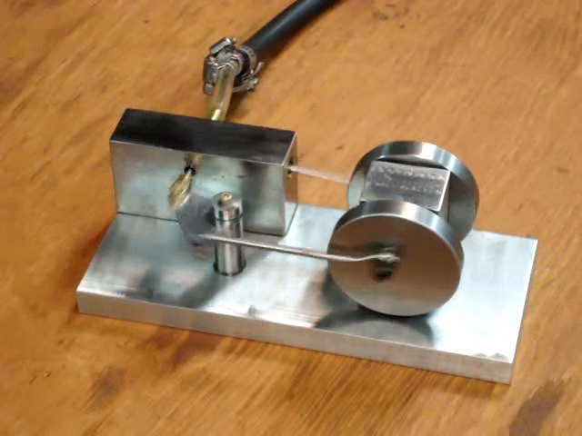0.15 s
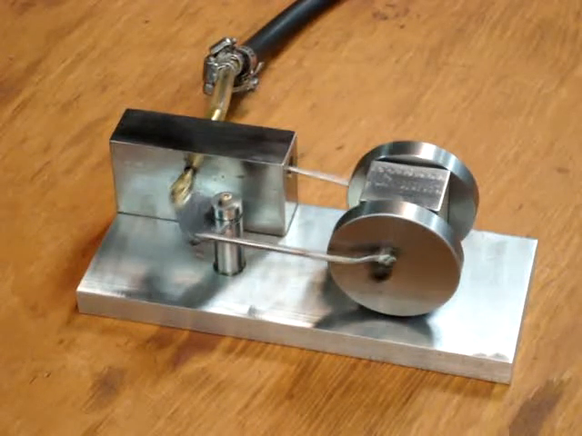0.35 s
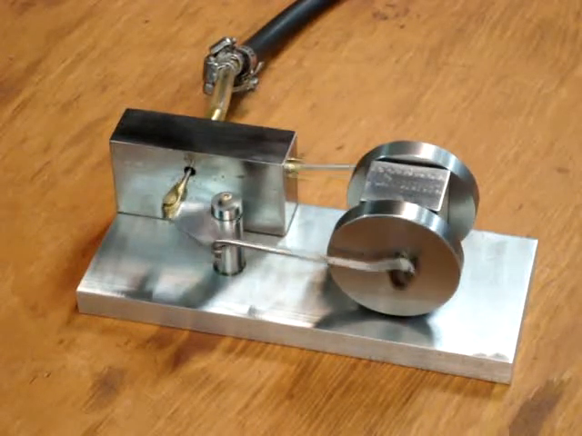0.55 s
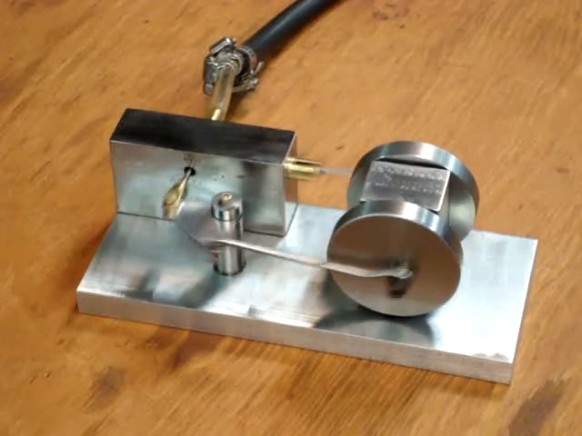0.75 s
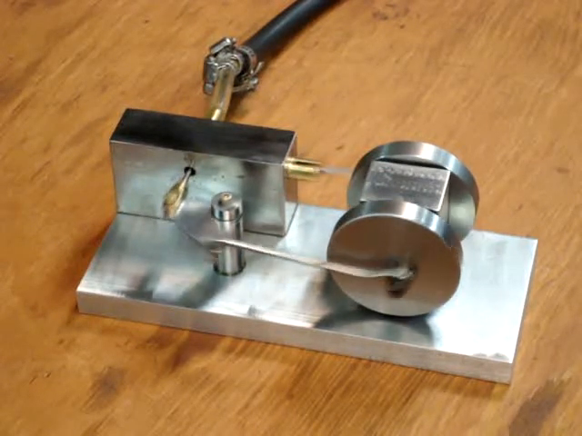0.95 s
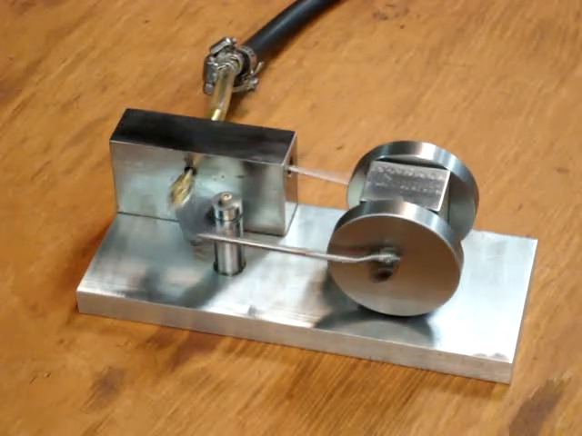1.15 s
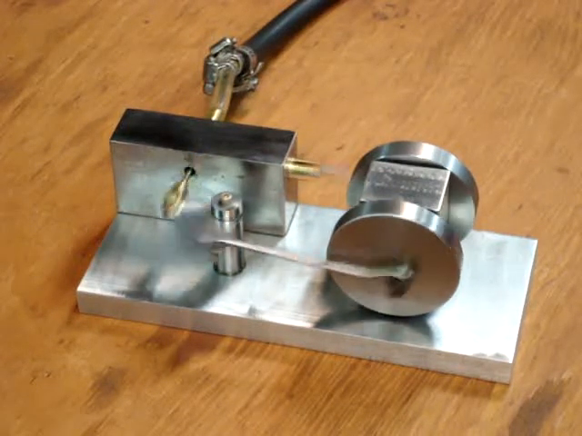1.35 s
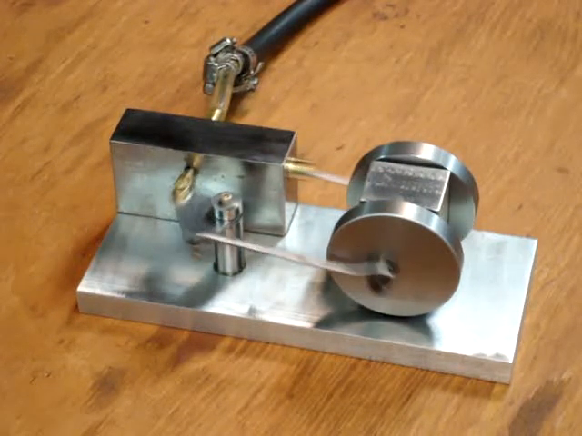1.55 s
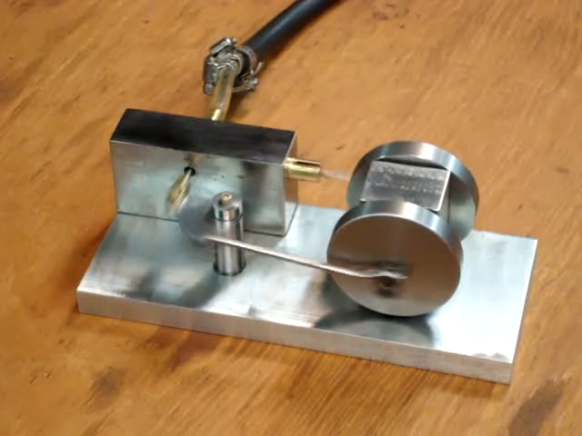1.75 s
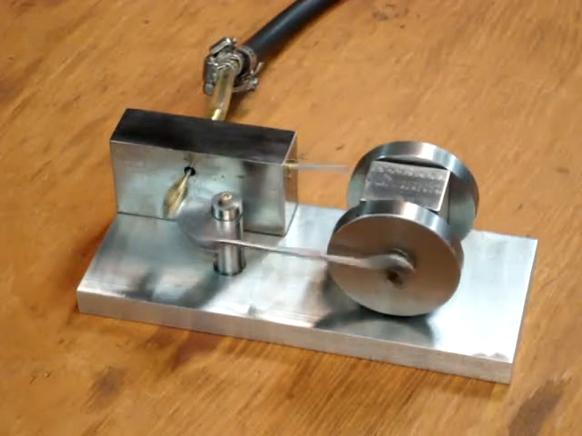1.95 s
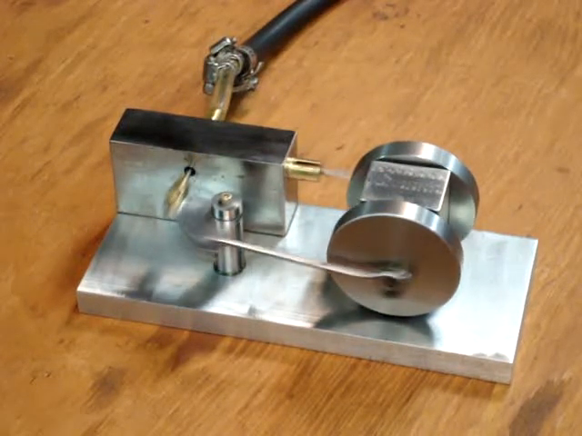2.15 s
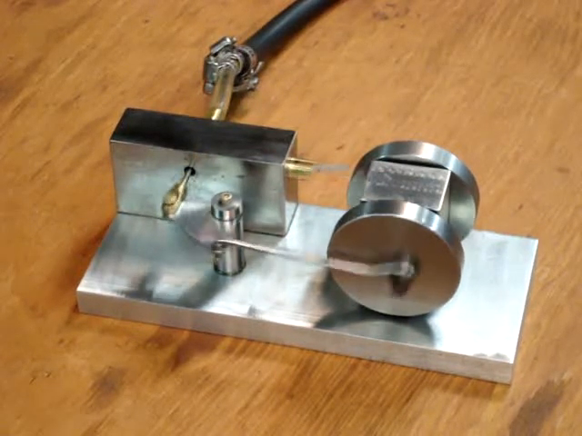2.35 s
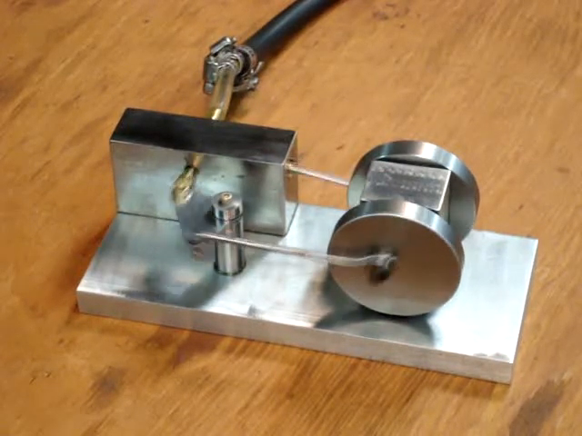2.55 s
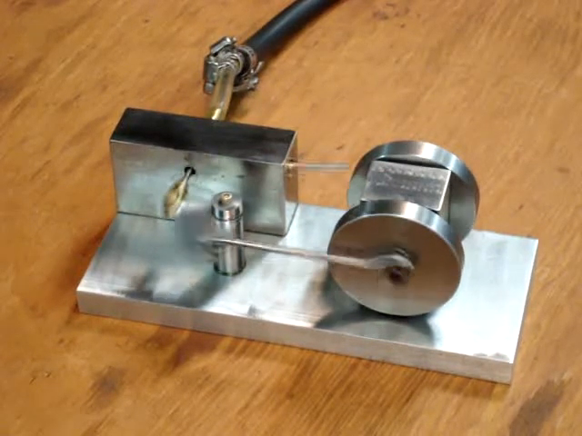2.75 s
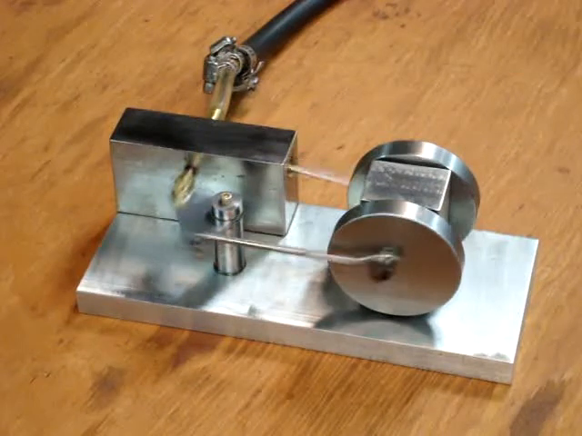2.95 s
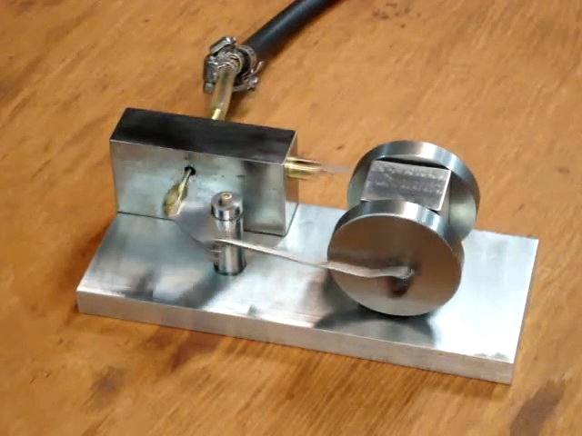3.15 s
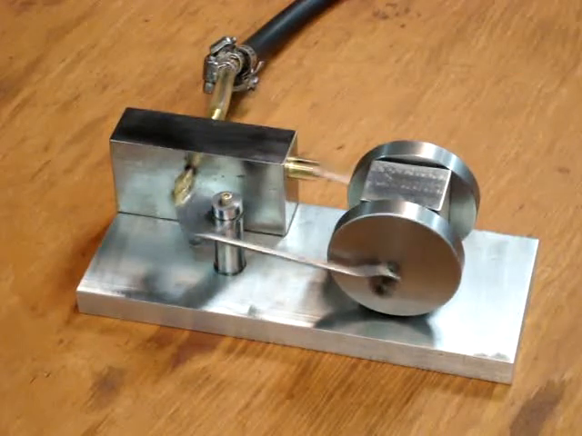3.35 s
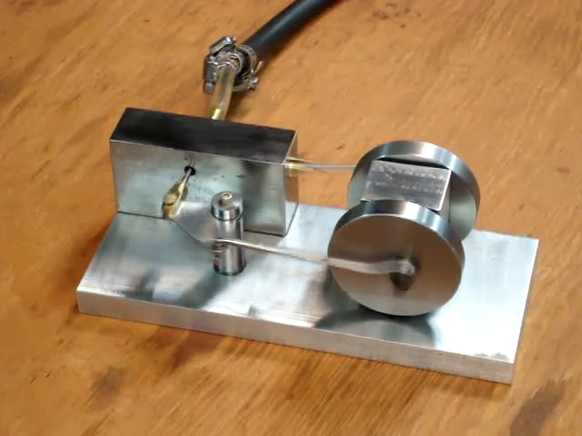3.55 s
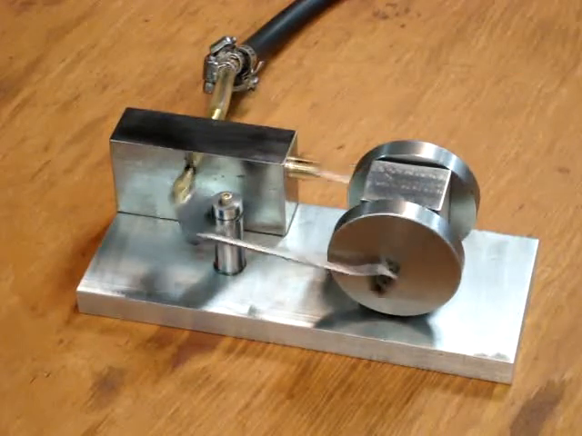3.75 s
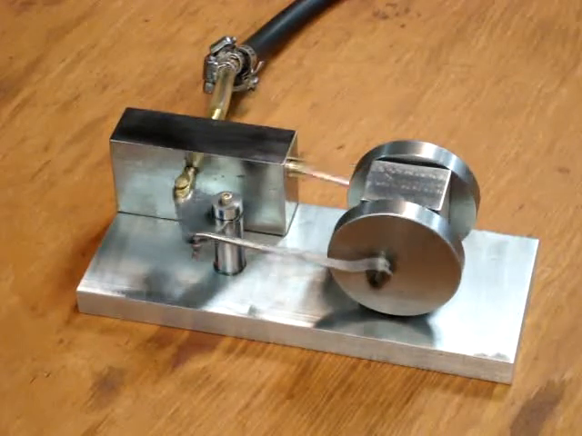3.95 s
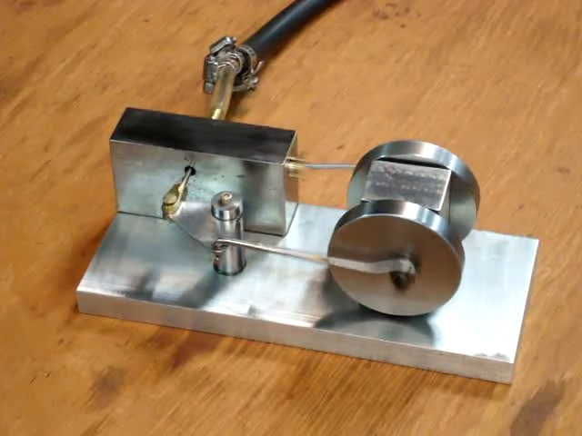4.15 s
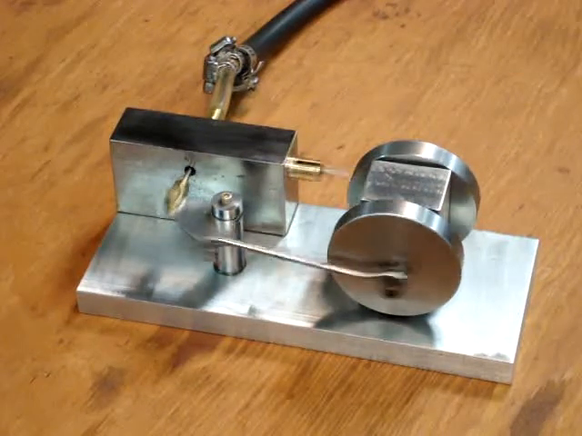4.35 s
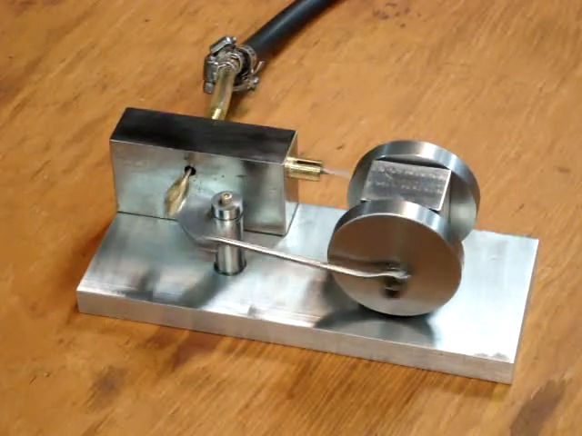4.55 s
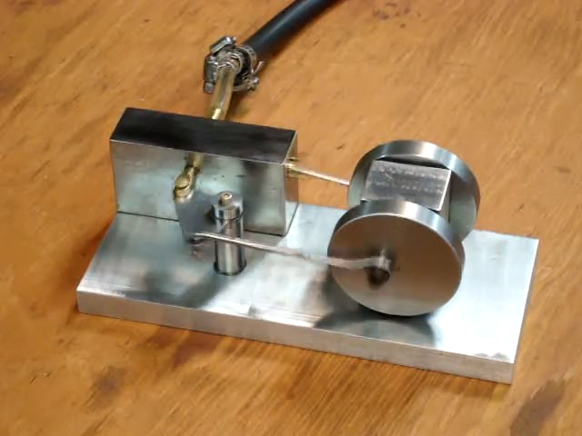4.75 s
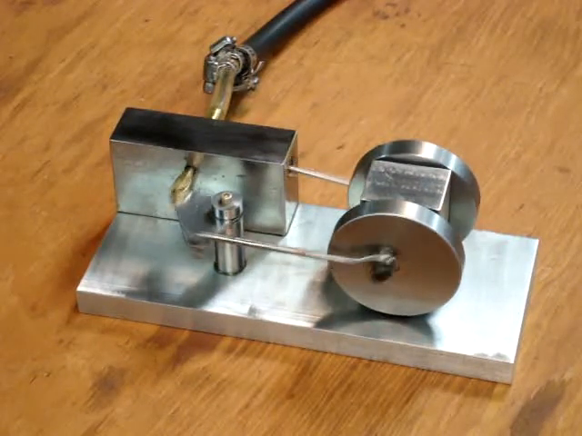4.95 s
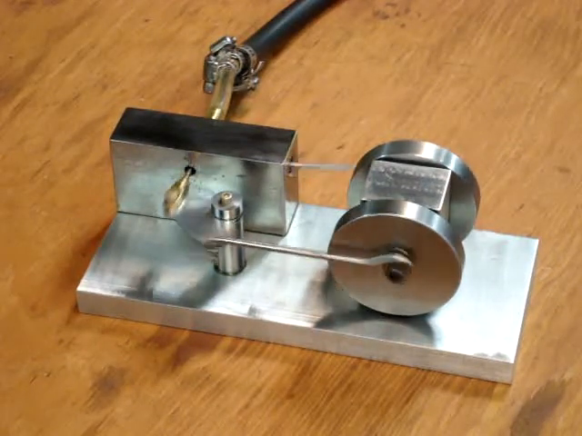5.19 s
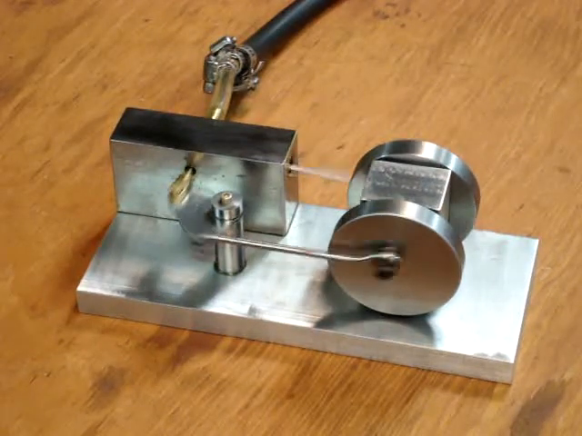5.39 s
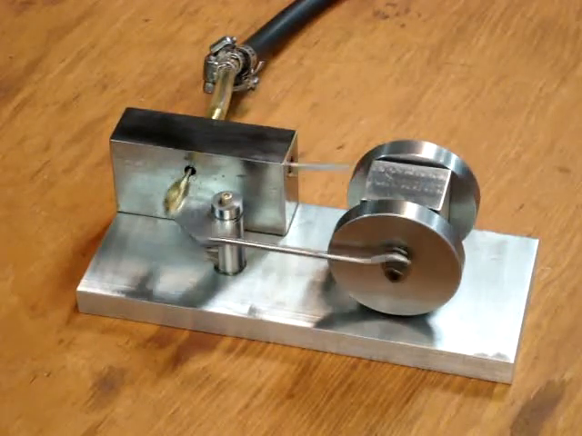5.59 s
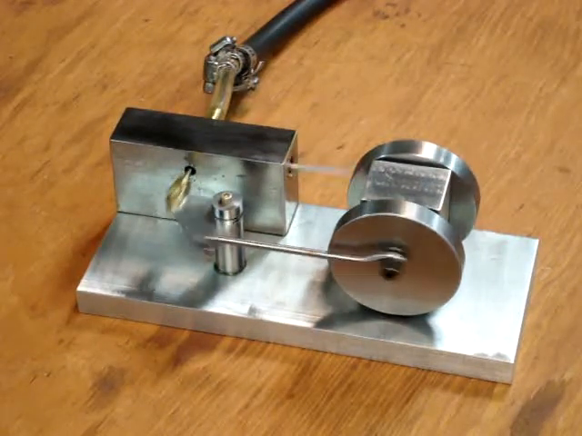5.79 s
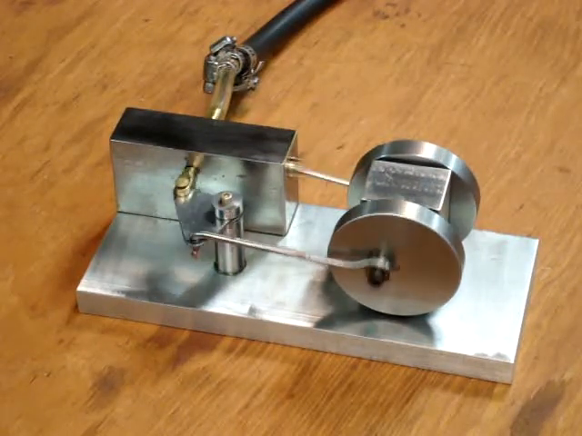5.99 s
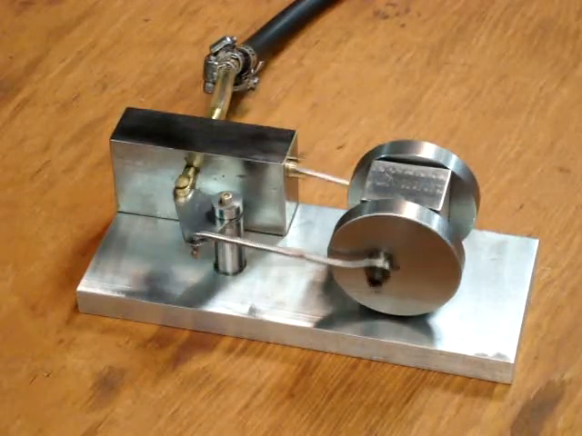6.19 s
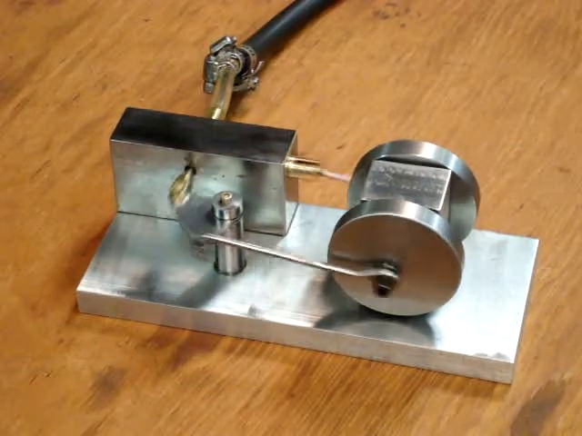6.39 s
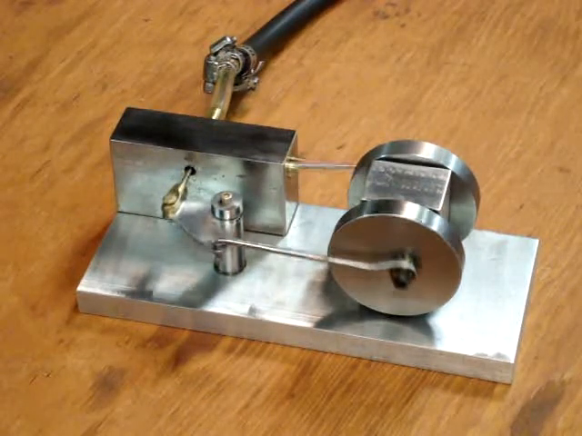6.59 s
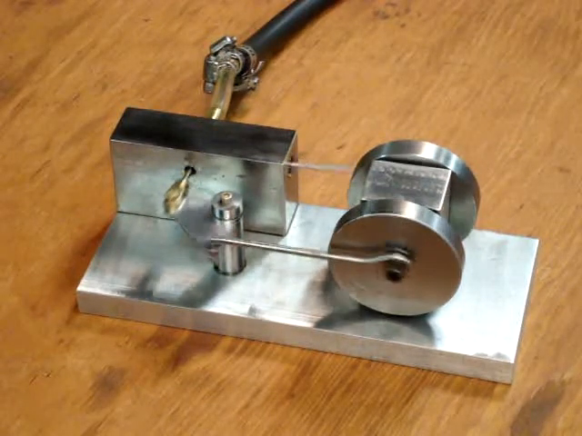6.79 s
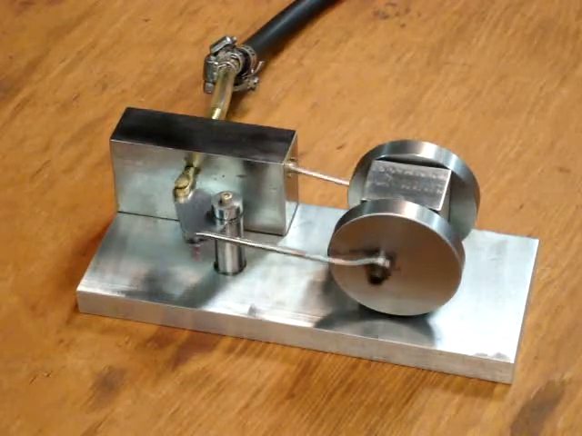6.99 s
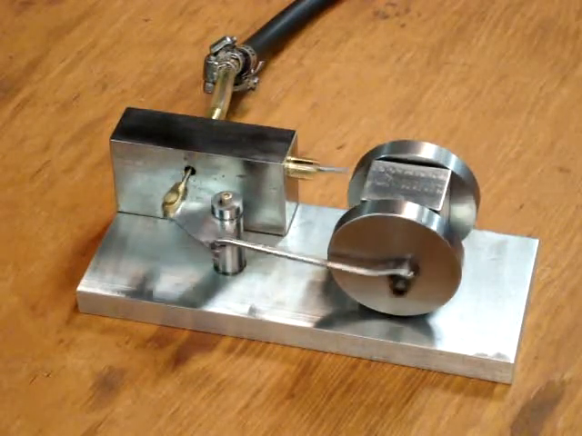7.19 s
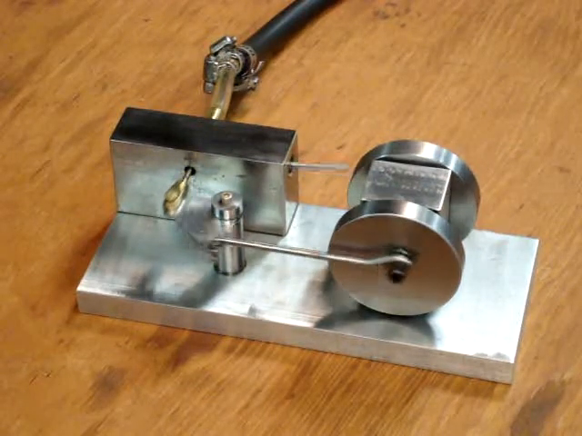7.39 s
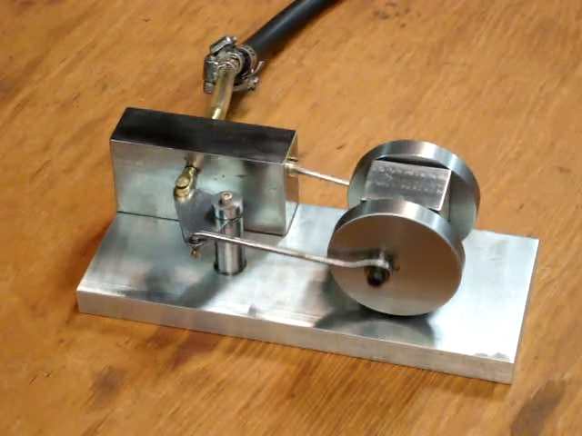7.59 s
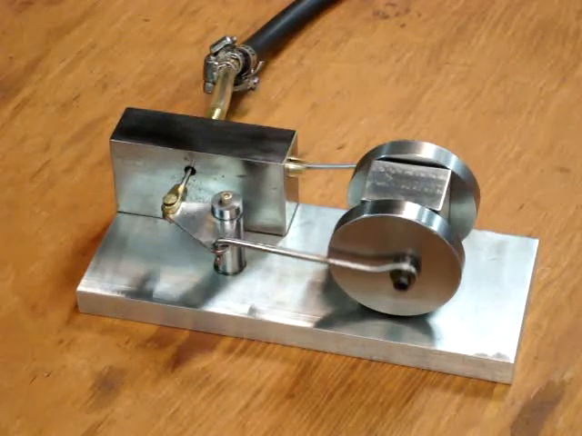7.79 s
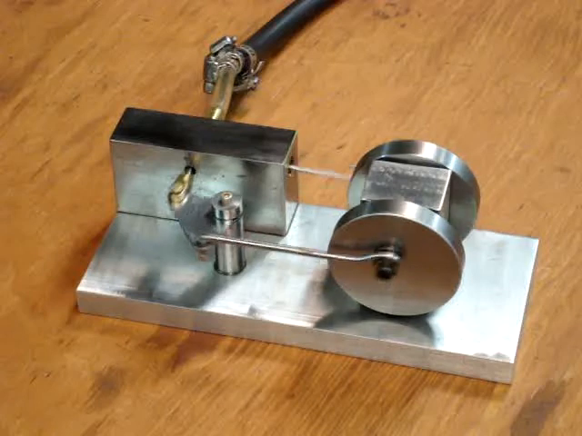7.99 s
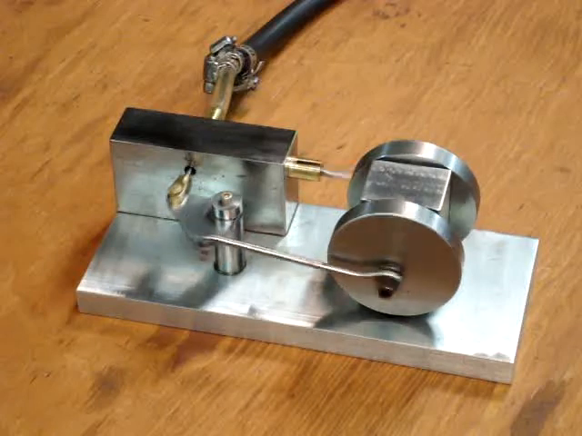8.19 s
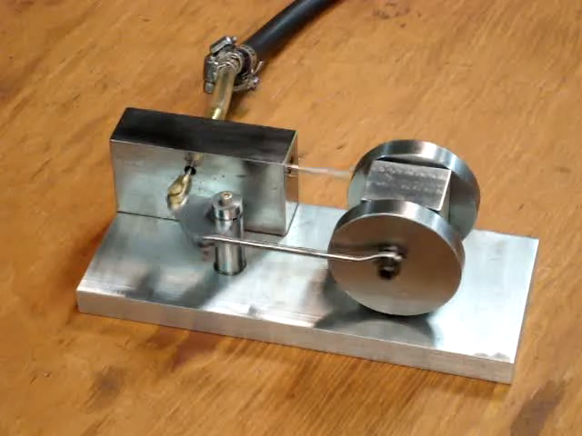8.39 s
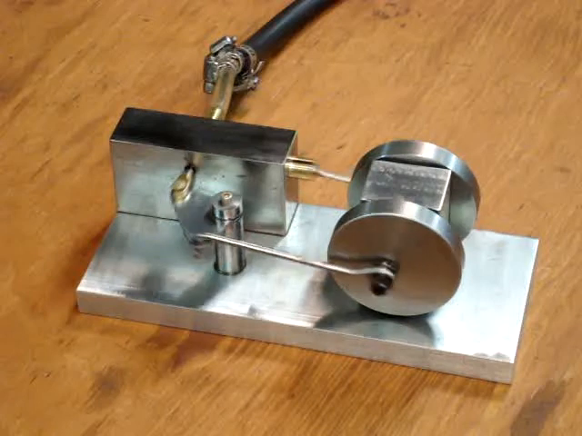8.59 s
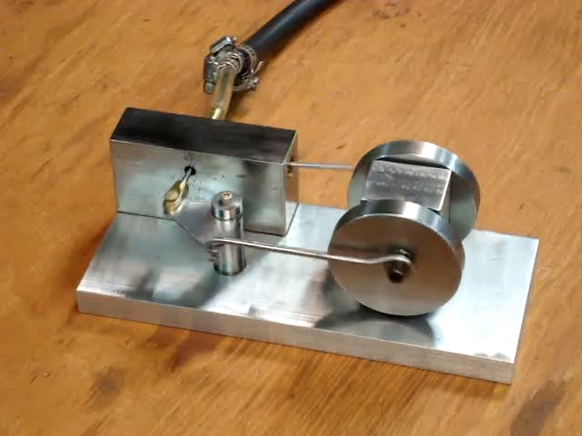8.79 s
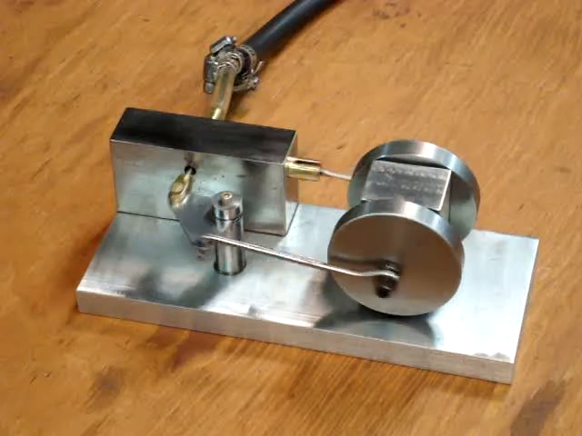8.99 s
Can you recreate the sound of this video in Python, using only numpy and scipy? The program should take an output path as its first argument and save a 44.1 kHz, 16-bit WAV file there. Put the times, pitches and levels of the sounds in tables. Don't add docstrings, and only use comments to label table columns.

```python
import sys
import numpy as np
from scipy import signal
from scipy.fft import rfft, irfft
from scipy.io import wavfile
from scipy.ndimage import uniform_filter1d, minimum_filter1d

SR = 44100
rng = np.random.default_rng(int(sys.argv[2]) if len(sys.argv) > 2 else 0)


def magnitude_from_level(level_db):
    exponent = np.asarray(level_db, float) / 20
    return 10 ** exponent


def output_pcm(signal):
    pcm = np.clip(np.atleast_2d(signal).T, -1, 1) * 32767
    wavfile.write(sys.argv[1], SR, np.round(pcm).astype(np.int16))


N = 398223
TIME = np.arange(N) / SR
LAZY_TURN_S = 0.17


def unit(x):
    return x / np.sqrt(np.mean(x ** 2))


def topped(x, db):
    return x * magnitude_from_level(db) / np.abs(x).max()


def walk(rate_hz):
    k = int(SR / rate_hz)
    return unit(uniform_filter1d(uniform_filter1d(rng.standard_normal(N), k), k))


def coloured(points):
    hz, db = np.transpose(points)
    axis = np.log(np.fft.rfftfreq(N, 1 / SR) + 1)
    shape = magnitude_from_level(np.interp(axis, np.log(hz), db, left=-60))
    return unit(irfft(rfft(rng.standard_normal(N)) * shape, N))


def ring(x, modes, sense=-1):
    out = 0
    for k, (hz, db, t60) in enumerate(modes):
        pole = np.exp(2j * np.pi * hz / SR - np.log(1000) / (t60 * SR))
        mode = signal.lfilter([0, pole.imag], [1, -2 * pole.real, abs(pole) ** 2], x + 1e-18)
        out = out + sense ** k * magnitude_from_level(db) * mode
    return out


def blows(times, db, push_ms):
    x = np.zeros(N)
    place = np.asarray(times) * SR
    np.add.at(x, place.astype(int), magnitude_from_level(db) * (1 - place % 1))
    np.add.at(x, place.astype(int) + 1, magnitude_from_level(db) * (place % 1))
    push = np.exp(-0.5 * (np.arange(-40, 41) / (push_ms * SR / 1000)) ** 2)
    return np.convolve(x, push / push.sum(), "same")


def rattle(hit, t60):
    fade = signal.lfilter([1], [1, -np.exp(-np.log(1000) / (t60 * SR))], hit)
    return fade * rng.standard_normal(N) * magnitude_from_level(3 * walk(500))


# t/s, rate/(turns per s)
FLYWHEEL = [(0.0, 5.7163), (0.58, 5.6899), (0.84, 5.9451), (1.05, 6.4457), (1.38, 7.5074), (1.64, 7.9698),
            (2.02, 8.0224), (3.03, 7.5013), (3.62, 6.9713), (4.75, 5.6031), (5.41, 4.9757), (6.91, 3.4855),
            (7.11, 3.4541), (8.07, 2.8346), (9.03, 2.5196)]


def speed(s):
    return np.interp(s, *np.transpose(FLYWHEEL))


def crank():
    start_turn = 0.8235
    return start_turn + np.cumsum(speed(TIME)) / SR


def passes(angle, slip_per_s=0.):
    turns = crank()
    whole = np.arange(1, int(turns[-1]) + 1)
    lazy = np.maximum(1 / speed(np.interp(whole + angle, turns, TIME)) - LAZY_TURN_S, 0)
    s = np.interp(whole + angle - slip_per_s * lazy, turns, TIME)
    return s[s < TIME[-1]]


# t/s, table rumble level/dB, scuff level after the knock/dB, scuff level at the far end/dB
RUN = [(0.0, -45.5, -39.5, -42), (0.6, -46.5, -39.5, -43), (0.9, -45.5, -37.5, -32),
       (1.08, -43.5, -30.5, -33.5), (1.3, -41, -34, -33), (1.72, -42, -40.5, -42), (2.0, -40.5, -37.5, -43),
       (2.6, -42.5, -36.5, -47.5), (3.6, -43.5, -41, -49), (4.7, -47.5, -42, -51.5), (5.4, -48.5, -45, -54),
       (6.2, -51.5, -40.5, -45.5), (6.8, -53, -44, -48.5), (7.25, -55, -40.5, -45.5), (7.7, -58, -39, -49),
       (8.25, -59, -39, -41.5), (8.65, -60, -41, -44.5), (9.03, -60, -41, -44.5)]


def run(s, axis):
    return np.interp(s, np.array(RUN)[:, 0], np.array(RUN)[:, axis])


# t/s, level/dB
KNOCK = [(0, -29.2), (.9, -27.8), (1.06, -26.2), (1.74, -26.3), (1.85, -23.4), (2.4, -22.2), (3.4, -23.8),
         (4.7, -25.2), (5.22, -28.2), (6.06, -28), (6.29, -33.7), (6.55, -32.3), (7.1, -46.5), (7.7, -45.2),
         (8.4, -45.6), (9.03, -49)]


def knock_strength(s):
    return np.interp(s, *np.transpose(KNOCK))


# f/Hz, level/dB
HUM = [(120, -87), (240, -73), (1320, -77), (1560, -74.5), (1680, -93.5)]
# f/Hz, level/dB per Hz
HUSH = [(30, -28.5), (110, -22), (230, -13), (500, -5), (1000, -13), (1900, -22), (4900, -24.5),
        (7600, -28), (9800, -24)]


def background():
    hum = sum(magnitude_from_level(db + 2.0 + 0.91 * walk(1)) * np.sin(2 * np.pi * hz * TIME) for hz, db in HUM)
    return magnitude_from_level(-54.5) * coloured(HUSH) + hum


# delay/ms, level/dB
ECHOES = [
    (8.0, -24),
    (19.5, -17),
]


def room(x):
    tail_db, tail_t60_s = -18.5, 0.55
    t = np.arange(int(0.3 * SR)) / SR
    tail = rng.standard_normal(len(t)) * magnitude_from_level(-60 * t / tail_t60_s) * np.minimum(t / 0.0013, 1)
    reply = magnitude_from_level(tail_db) * unit(tail) / np.sqrt(len(t))
    reply[0] = 1
    for ms, db in ECHOES:
        reply[int(ms * SR / 1000)] += magnitude_from_level(db)
    return signal.fftconvolve(x, reply)[:N]


# f/Hz, level/dB, t60/s
TABLE = [(323, -15.5, 0.12), (400.2, -8.5, 0.094), (452.4, -4.5, 0.24), (529.6, 3, 0.082), (590, 1, 0.038),
         (672.8, -1.5, 0.087), (784, -1.5, 0.019), (886.6, -3, 0.046), (945, -3.5, 0.12),
         (1010, -6.5, 0.14), (1040, -6.5, 0.074), (1082, -7.5, 0.13), (1132, -9, 0.086),
         (1203.6, -10, 0.18), (1263, -6.5, 0.053), (1446, -3.5, 0.017), (1555, -10, 0.077),
         (1704, -19, 0.1)]
# f/Hz, level/dB per Hz
SLIDE = [(1300, 0.5), (1900, -3.5), (2550, -2.5), (3400, -4), (4300, -6.5), (5700, -8.5), (7500, -13),
         (10000, -15.5)]


def bearings(turns, rumble_db, slide_db):
    spots = rng.standard_normal((2, 4096))
    rough = spots[0] * magnitude_from_level(1.84 * uniform_filter1d(spots[1], size=100) * 10)
    same = np.interp((turns % 1) * 4095, np.arange(4096), rough)
    swing_db = 2.6 * np.cos(2 * np.pi * (turns - 0.17)) + 1.1 * walk(30)
    force = (0.6 * unit(same) + unit(rng.standard_normal(N))) * magnitude_from_level(swing_db)
    force = force - uniform_filter1d(force, size=220)
    hiss = coloured(SLIDE) * magnitude_from_level(1.5 * np.cos(2 * np.pi * (turns - 0.1)) + 2 * walk(260))
    return magnitude_from_level(rumble_db - 1) * unit(ring(force, TABLE)) + magnitude_from_level(slide_db) * hiss


def scuffs():
    usual_ms, spread = 10.5, 0.19
    near, far = passes(0.033), passes(0.555, slip_per_s=0.2)
    s = np.r_[near, far]
    chance = rng.standard_normal((len(s), 4)).T
    ms = usual_ms * np.exp(spread * np.clip(chance[0], -2, 2) * np.minimum(speed(s) / 6, 1) ** 2)
    db = np.r_[run(near, axis=2), run(far, axis=3)] - 0.4 * (ms - usual_ms) + 0.9 * chance[1]
    ms[:len(near)] += 7 * np.maximum(1 / speed(near) - LAZY_TURN_S, 0)
    ms[len(near):] -= 10 * np.maximum(1 / speed(far) - LAZY_TURN_S, 0)
    climb = np.r_[3 + 0 * near, -4.5 + 0 * far] + 2.5 * chance[3]
    late = 0.0004 * (ms - usual_ms) + 0.0005 * chance[2]
    return zip(s + late, db, ms, climb)


# f/Hz, level/dB, t60/s
BORE = [(6483, -2.5, 0.0027), (7017, 5.5, 0.0045), (7607, 13, 0.0016), (7948, 5.5, 0.0037),
        (8790, -16, 0.0044), (9840, -11.5, 0.0038)]


def piston():
    swell = np.zeros((2, N))
    for s, db, ms, climb in scuffs():
        near = slice(max(int((s - 0.05) * SR), 0), int((s + 0.08) * SR))
        late = (TIME[near] - s - np.array([[-0.5], [0.5]]) * climb / 1000) / (ms / 1000)
        swell[:, near] += magnitude_from_level(db) * (np.exp(-np.abs(late / 0.7) ** 3) + 0.31 * (late > 0) * np.exp(-late / 5.6))
    grains = rng.standard_normal(N) * magnitude_from_level(3.5 * walk(700))
    low, high = ring(grains, BORE[:3]), -ring(grains, BORE[3:])
    body = np.std(low + high)
    low = low + body * rng.standard_normal(N) * magnitude_from_level(-20)
    steady = np.sqrt(uniform_filter1d(low ** 2 + high ** 2, size=260))
    return magnitude_from_level(-0.5 + 1.8 * walk(380)) * (swell[0] * low + swell[1] * high) / steady


# f/Hz, level/dB, t60/s
LEVER_LOOSE = [(3500, -8, .012), (3900, -3, .015), (4150, 0, .02), (4320, 0, .02), (4650, -4, .012),
               (5280, -5, .014)]


def lift(s, db):
    turn_s = 1 / speed(s)
    chance = rng.standard_normal((len(s), 2)).T
    times = s - (0.123 + 0.004 * chance[0]) * turn_s
    hit = blows(times, db - 26 + 2 * chance[1], push_ms=0.02)
    return ring(hit + magnitude_from_level(-9.0) * rattle(hit, t60=0.027), LEVER_LOOSE)


# turn number, level/dB
ODD_TAPS = [
    (9, -32.7),
    (10, -31.5),
    (11, -28.2),
    (12, -38.2),
    (39, -44.5),
    (41, -41.9),
    (44, -44),
    (45, -47),
]


def taps():
    stops_hz = 4.2
    s = passes(0.744, slip_per_s=0.16)
    db = knock_strength(s) - 9 + 0.68 * rng.standard_normal(len(s))
    lands = speed(s) > stops_hz
    for turn, odd_db in ODD_TAPS:
        db[turn - 1], lands[turn - 1] = odd_db, True
    upper_db = -1.5 + 1.5 * rng.standard_normal(len(s))
    return s[lands], db[lands], upper_db[lands]


# f/Hz, level/dB, t60/s
LEVER = [(3050, -3, .006), (3600, -6, .006), (4080, -1, .011), (4350, -2, .011), (5270, 3, .014),
         (5800, -6, .006)]


def lever(s, db, upper_db):
    chance = rng.standard_normal((len(s), 2)).T
    times = np.r_[s - 0.0009, s + 0.003 + 0.0001 * chance[0]]
    size_db = np.r_[db, db - 4 + 1.5 * chance[1]]
    low = blows(times, size_db, push_ms=0.02)
    high = blows(times, size_db + np.tile(upper_db, 2), push_ms=0.02)
    contact = [(4300, 0, 0.0008)]
    clicks = ring(ring(low, contact), LEVER[:4]) + ring(ring(high, contact), LEVER[4:])
    chatter = ring(magnitude_from_level(-38.5) * rattle(np.roll(low, 200), t60=0.18), LEVER_LOOSE)
    chatter = chatter + ring(magnitude_from_level(-16) * rattle(low, t60=0.06), contact)
    thud = magnitude_from_level(-13) * ring(blows(s, db, push_ms=0.05), TABLE)
    return topped(clicks, db.max() + 4.0) + chatter + thud


def creep(s, db):
    scrape = 0
    for early_s, hz, step_db in ((0.014, 2150, -3), (0.006, 2500, 0), (-0.003, 2650, 3)):
        push = blows(s - early_s, db + step_db + 26.5, push_ms=0.1)
        rub = uniform_filter1d(push, size=330) * rng.standard_normal(N)
        scrape = scrape + ring(rub, [(hz, 0, 0.012)])
    return scrape + magnitude_from_level(-13.0) * ring(blows(s + 0.012, db, push_ms=0.045), TABLE)


def knocks():
    s = passes(0)
    return s, knock_strength(s) + 0.4 * rng.standard_normal(len(s))


# f/Hz, level/dB, t60/s
ROD = [(2470, 0, .015), (2650, 0, .015), (2900, -7, .01), (3280, -8, .006)]
# f/Hz, level/dB, t60/s
ROD_LOOSE = [(2240, 0.5, 0.0031), (2580, -5.5, 0.0084), (2766, -11.5, 0.023), (3364, -3, 0.0069),
             (4330, -12, 0.0076), (5210, -7.5, 0.0053)]


def rod(s, db):
    hit = blows(s - 0.0011, db, push_ms=0.02)
    knock = ring(ring(hit, [(2650, 0, 0.002)]), ROD, sense=1)
    knock = signal.sosfilt(signal.butter(4, 2050, "high", fs=SR, output="sos"), knock)
    knock = topped(knock, db.max() + 1.5)
    rub = uniform_filter1d(np.roll(hit, -150), size=260) * rng.standard_normal(N)
    loose = ring(magnitude_from_level(-29.0) * rattle(np.roll(hit, 90), t60=0.08) + magnitude_from_level(13.5) * rub, ROD_LOOSE)
    shudder = magnitude_from_level(-41.0) * ring(rattle(np.roll(hit, 60), t60=0.04), TABLE[7:])
    edge_hit = blows(s - 0.0008, db + 3 * rng.standard_normal(len(s)), push_ms=0.012)
    edge = topped(ring(ring(edge_hit, [(3300, 0, 0.0043)]), ROD[2:]), db.max() - 10)
    thud = magnitude_from_level(-23.5) * ring(blows(s + 0.00384, db, push_ms=0.2), TABLE)
    return knock + edge + loose + shudder + thud


def scene():
    slow_s = 7.0
    rumble_db = run(TIME, axis=1)
    slide_db = -57.5 + 0.69 * (rumble_db + 47)
    scuff, tap, (s, db) = piston(), taps(), knocks()
    quick = s < slow_s
    parts = rod(s[quick], db[quick]) + creep(s[~quick], db[~quick])
    parts = parts + lever(*tap) + lift(*tap[:2])
    engine = room(parts + 0.17 * scuff) + 0.83 * scuff + bearings(crank(), rumble_db - 0.5, slide_db)
    engine = signal.sosfilt(signal.butter(3, 230, "high", fs=SR, output="sos"), engine)
    return (engine + background())[None]


def thin_treble(x):
    drop_db, spread_db = -12.5, 3.6
    hz, _, z = signal.stft(x, SR, window="hann", nperseg=384, noverlap=256)
    bands_hz = [2500, 3100, 3700, 4400, 5100, 5800, 6500, 7200, 8000, 8800, 9500, 11000]
    edges = np.searchsorted(hz, bands_hz)
    power = uniform_filter1d(np.add.reduceat(np.abs(z) ** 2, edges)[:-1], size=2, axis=1)
    loud = -minimum_filter1d(-power, size=15, axis=1, origin=0)
    loud = np.maximum(loud, magnitude_from_level(np.linspace(-38, -31, len(loud)))[:, None] * loud.max(axis=0))
    shape = np.array([len(loud) + 1, z.shape[1]])
    frame = np.repeat(rng.standard_normal(shape // [1, 9] + [0, 1]), 9, axis=1)[:, :shape[1]]
    block = np.repeat(rng.standard_normal(shape // [1, 2] + [0, 1]), 2, axis=1)[1:, :shape[1]]
    mood = frame[0] + 0.4 * frame[1:] + 0.7 * block - np.linspace(1.7, -0.2, len(loud))[:, None]
    keep = power > loud * magnitude_from_level(2 * (drop_db + spread_db * mood))
    z[edges[0]:edges[-1]] *= np.repeat(keep, np.diff(edges), axis=0)
    return signal.istft(z, SR, window="hann", nperseg=384, noverlap=256)[1][:N]


def low_pass(x):
    return signal.sosfilt(signal.butter(12, 10750, fs=SR, output="sos"), x)


def record(dry):
    top_cut = signal.ellip(10, 0.3, 70, 9900, fs=SR, output="sos")
    mix = signal.sosfilt(top_cut, thin_treble(dry[0]))
    return low_pass(mix[None])


dry = scene()
out = record(dry)
output_pcm(out)
```